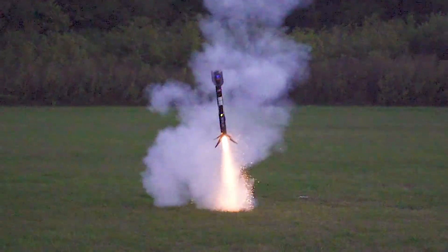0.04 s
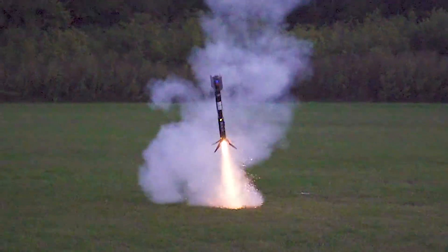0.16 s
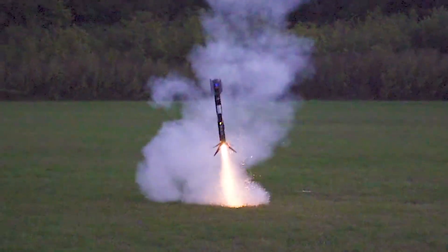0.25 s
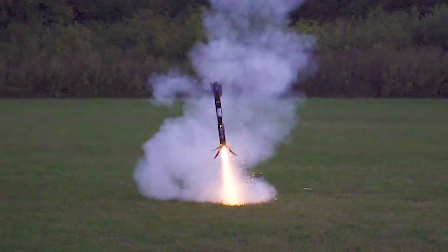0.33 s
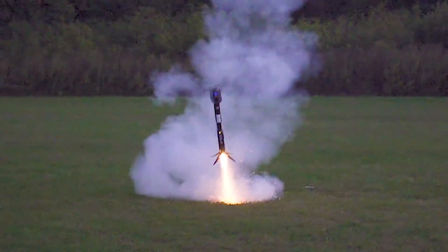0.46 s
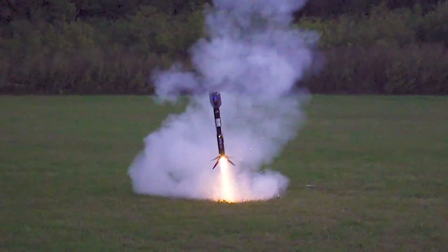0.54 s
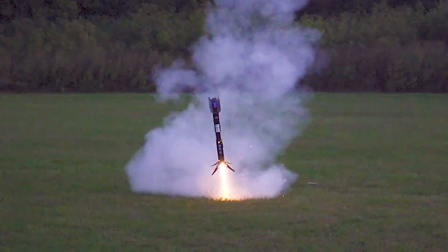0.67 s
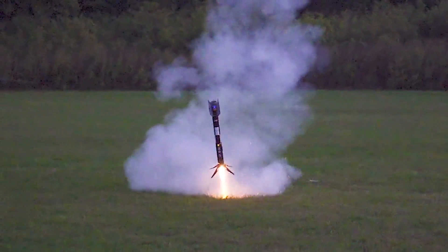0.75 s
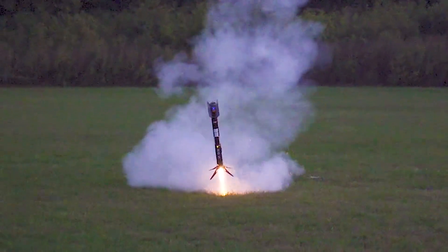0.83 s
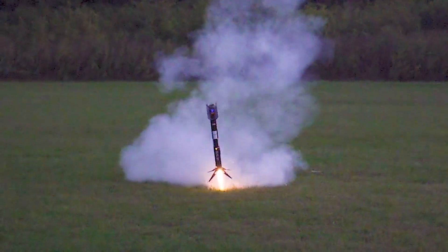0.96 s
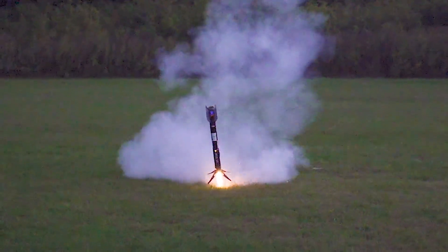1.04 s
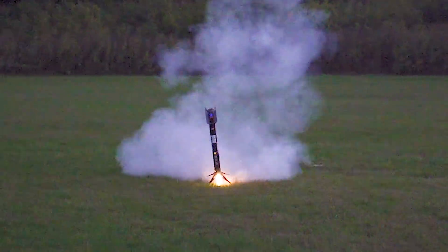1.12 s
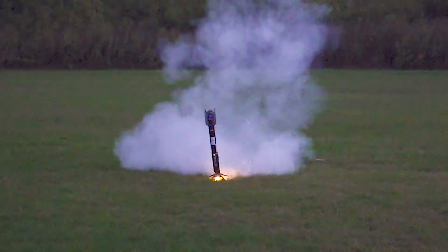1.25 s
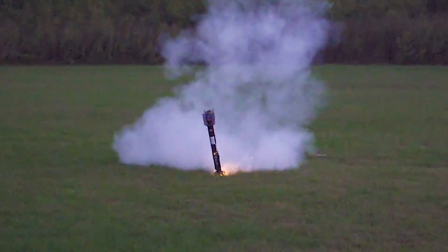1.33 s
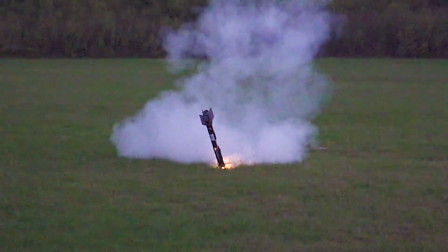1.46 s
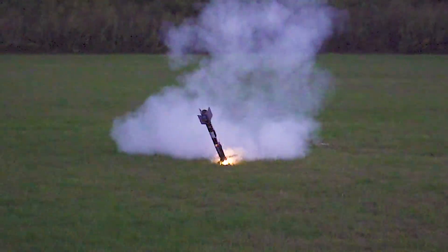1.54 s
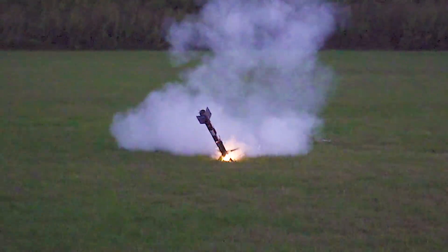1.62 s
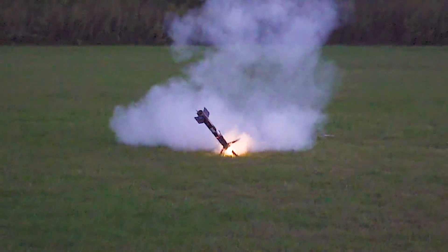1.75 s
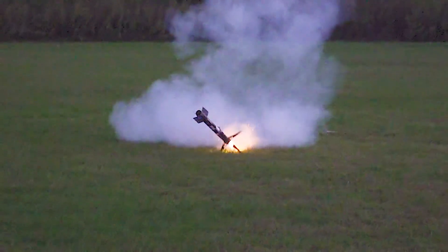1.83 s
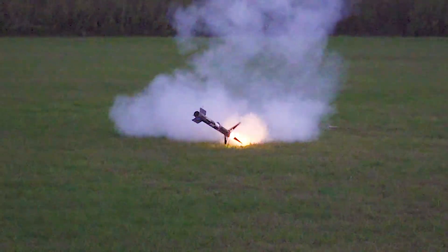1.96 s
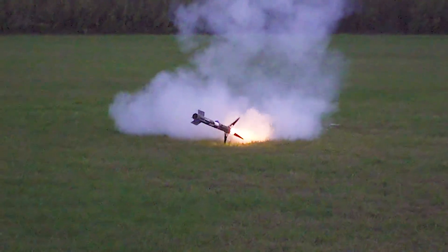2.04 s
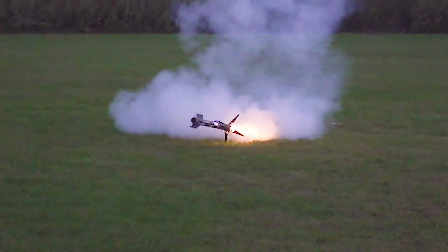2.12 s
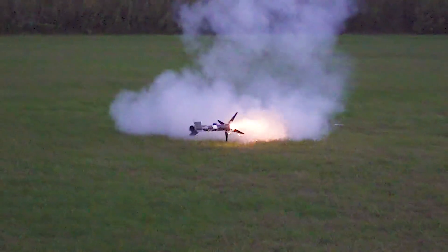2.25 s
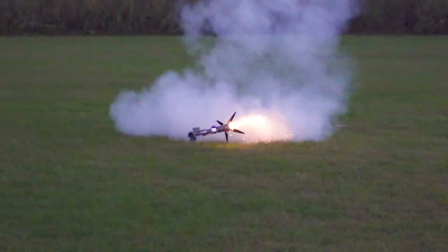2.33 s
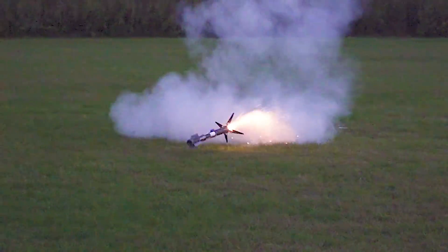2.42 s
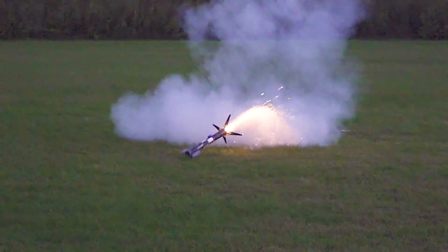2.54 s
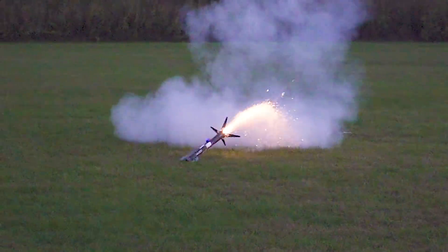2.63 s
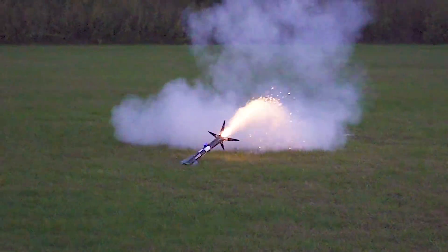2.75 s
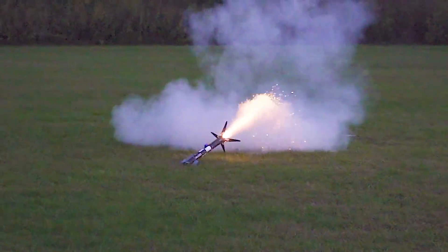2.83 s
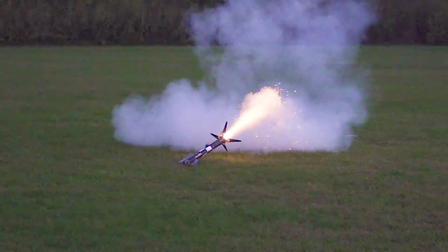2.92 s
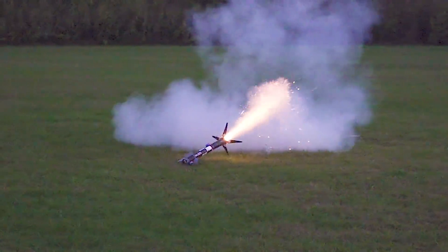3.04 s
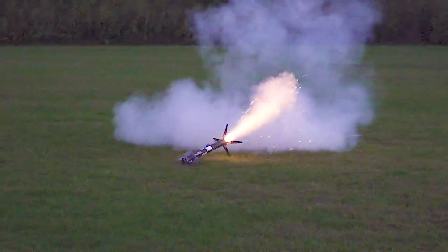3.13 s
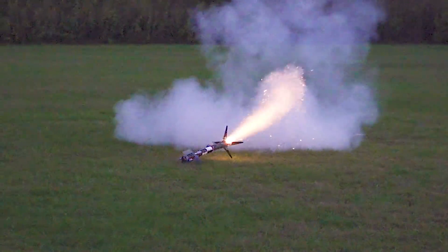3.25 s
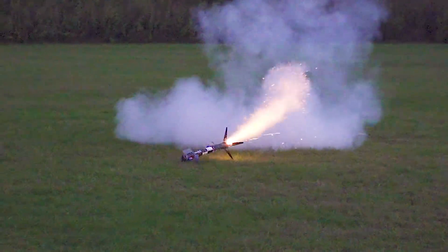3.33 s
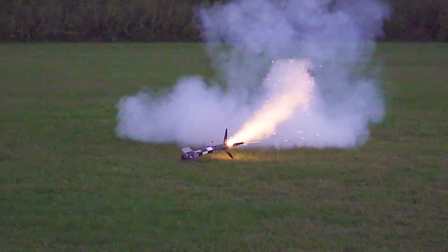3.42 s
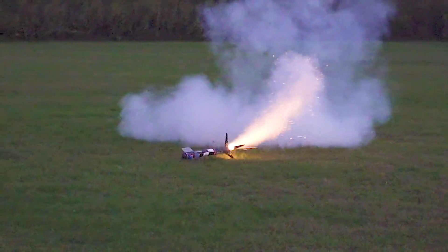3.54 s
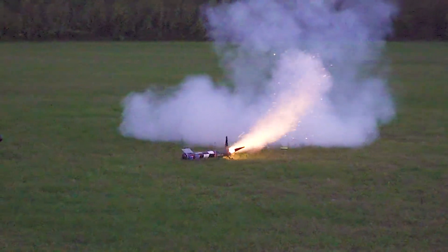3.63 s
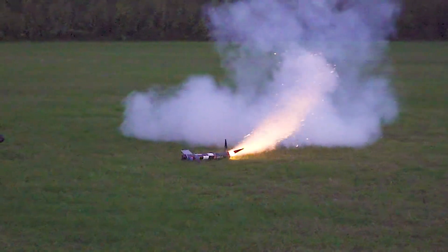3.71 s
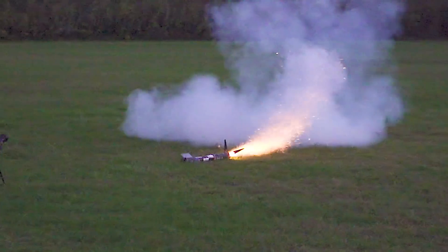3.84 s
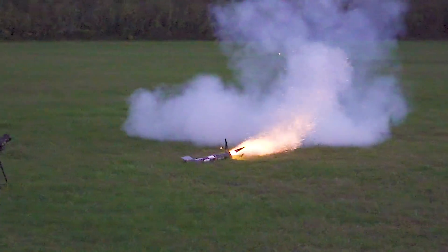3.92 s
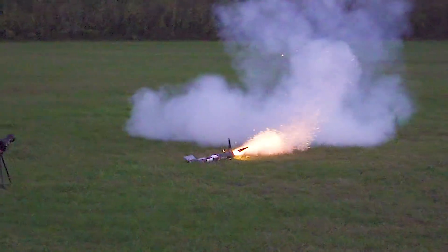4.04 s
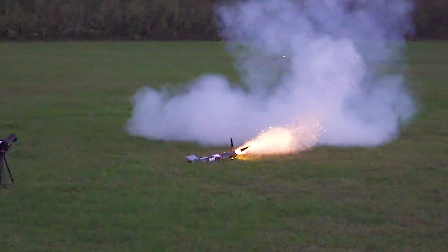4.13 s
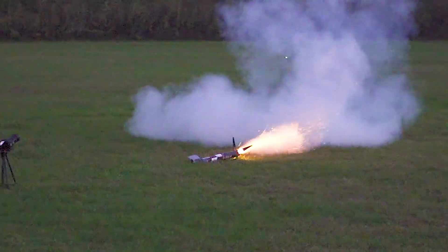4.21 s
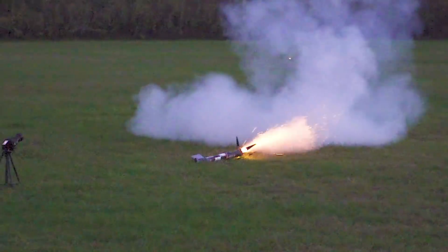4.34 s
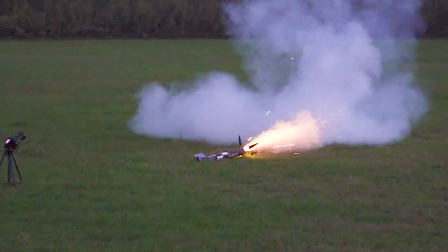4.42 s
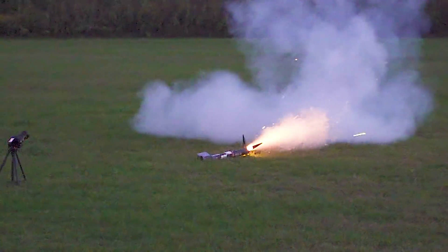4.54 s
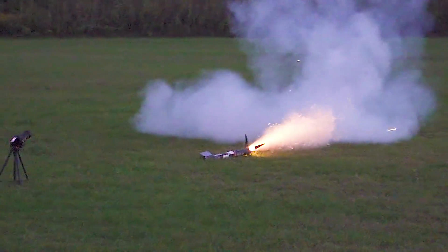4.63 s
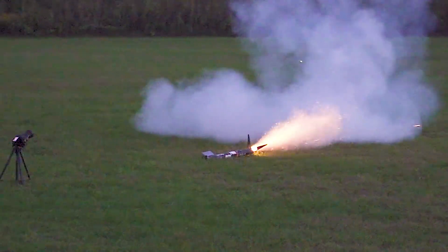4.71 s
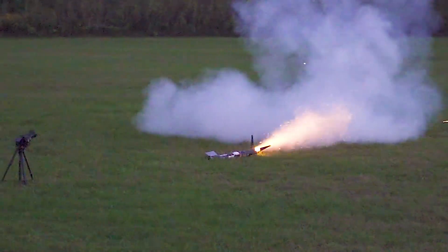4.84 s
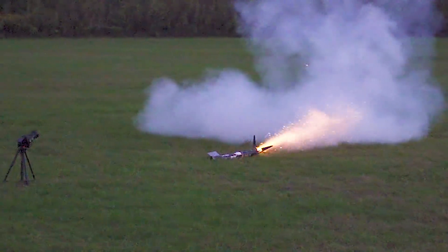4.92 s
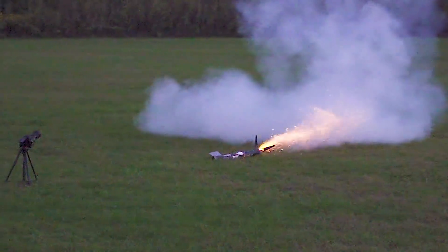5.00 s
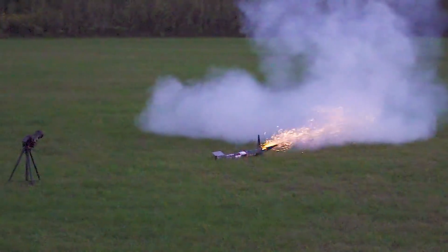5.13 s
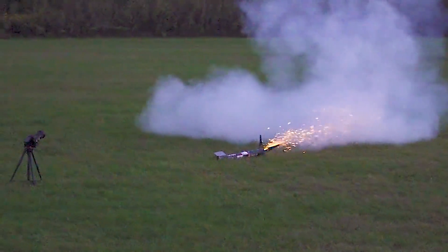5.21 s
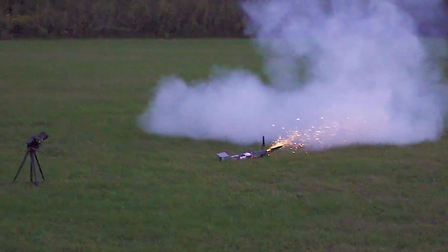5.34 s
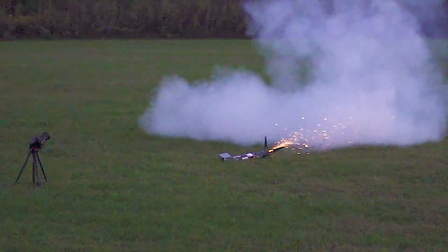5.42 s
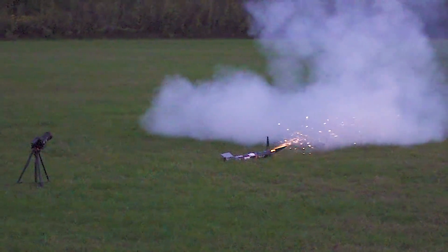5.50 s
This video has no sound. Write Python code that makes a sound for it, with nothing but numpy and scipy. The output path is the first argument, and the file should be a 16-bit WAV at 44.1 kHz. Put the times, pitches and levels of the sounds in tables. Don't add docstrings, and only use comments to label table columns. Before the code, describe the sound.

Loud slowed-down rocket exhaust rumbles and crackles dully over a field, shifting in tone as it topples, then burns out abruptly, bass fading last.

```python
import sys
import numpy as np
from scipy import signal
from scipy.fft import rfft, irfft, next_fast_len
from scipy.io import wavfile
from scipy.ndimage import uniform_filter1d

SR = 44100
rng = np.random.default_rng(int(sys.argv[2]) if len(sys.argv) > 2 else 0)


def rack_gain(trim_db):
    fader = np.asarray(trim_db, float)
    return 10 ** (fader / 20)


def wav_out(sig):
    wavfile.write(sys.argv[1], SR, np.round(np.clip(np.atleast_2d(sig).T, -1, 1) * 32767).astype(np.int16))


N = 245637
TIME = np.arange(N) / SR
SIZE = next_fast_len(N + SR // 2)
FREQ = np.maximum(np.fft.rfftfreq(SIZE, 1 / SR), 1)

# frequency in Hz, level in dB per Hz.
PLUME_COLOUR = [(12, -35), (20, 0.5), (117, 6), (215, 5.5), (327, -7), (440, -17.5), (488, -12.5),
                (628, -17.5), (775, -10), (1020, -12), (1260, -12), (1460, -15.5), (1580, -20), (2220, -17),
                (3040, -25.5), (3950, -66), (6690, -120)]
LAYER_EDGES_HZ = [12, 140, 255, 345, 430, 545, 680, 1050, 1580, 2150, 3400]
# level in dB, then its change in dB per dB of facing, of jet sharpness and of lean.
LAYERS = [(-17.5, -0.15, -.1, 0.45), (-16.5, -0.19, -0.39, -0.17), (-20.5, 0.43, -0.4, -0.75),
          (-29, 1.44, -0.46, -1), (-30.5, 0.99, -0.73, 0.72), (-27, 1.1, -.4, 0.58),
          (-20.5, 1.23, .25, -0.79), (-22, 1.07, 0.87, -0.46), (-31, 1.16, 1.1, -0.79),
          (-33, 0.55, 0.08, -1.1), (-55.5, 1.41, -0.12, 1)]
# time in seconds, facing the listener in dB, jet sharpness in dB, lean in dB.
NOZZLE = [(0.0, 5, -7, -0.1), (0.55, 5, -7, -0.8), (0.9, 4, -5, -0.5), (1.02, 1, -0.5, -2.1),
          (1.2, -3, -2.5, -1.5), (1.33, -4.5, -0.5, -1.9), (1.5, -10.5, 1.5, -0.1), (1.64, -7.5, 2.5, -5.5),
          (1.83, 0.8, 1.5, -2.5), (2.1, 0, 1, -1.1), (2.5, 5, 1.5, 3.1), (3.0, 5.5, 2, 3.8), (3.5, 4, 1, 4),
          (3.75, -1, -0.6, 1.3), (4.02, -7, -1, .6), (4.5, -1.5, -2.3, -0.5), (4.9, -4, 0.4, 0.5),
          (5.1, -7, -.8, 0)]
# centre in seconds, length in seconds, deep rumble swell in dB, boom swell in dB.
THUMPS = [(0.0, 0.017, 12.5, -6), (0.211, 0.12, -3, 2.5), (0.499, 0.016, -0.5, -3.5),
          (0.563, 0.045, -1.5, 4), (0.754, 0.073, -1.5, 1.6), (0.943, .04, -0.5, 1.1), (1.093, 0.24, 2, 0),
          (1.398, 0.034, 5.5, 1.5), (1.598, .1, -7, -3.5), (1.899, 0.089, -0.2, 5),
          (2.027, 0.049, 3.5, -0.5), (2.185, 0.027, 10, -0.4), (2.586, 0.039, -1, -3),
          (3.004, 0.088, -6.5, -0.8), (2.46, .03, -1.5, -2.4), (3.518, 0.18, -1, 0), (4.074, .05, 5, 1),
          (4.307, 0.038, 4.5, -2.3), (4.626, 0.056, -0.5, -1.5), (4.763, 0.033, -4.5, 0.3),
          (4.845, 0.073, 7, 0.8), (5.21, 0.024, -2, -2.5)]
# centre in seconds, length in seconds, swell in dB, pitch in Hz.
FLARES = [(0.0, 0.022, 5, 494), (0.495, 0.035, 2.5, 472), (0.921, 0.069, 3, 1187), (0.849, .1, -6.5, 3680),
          (1.041, 0.099, 2, 272), (1.056, .05, 5, 2220), (1.197, 0.035, -6, 1080), (1.27, .04, -8.5, 1300),
          (1.322, .03, 4.5, 896), (1.532, 0.14, 6, 367), (1.557, .08, 4, 1730), (1.657, 0.054, 6.5, 1730),
          (1.838, 0.11, -5.5, 412), (1.699, .08, -5.5, 4200), (1.946, .03, 3, 1290),
          (1.996, 0.11, -4.5, 4210), (2.051, 0.037, -7, 1270), (2.1, 0.054, 7.5, 650),
          (2.199, 0.26, 8, 2600), (2.335, .03, 3.5, 498), (2.674, .1, 4.5, 392), (2.946, 0.08, 3.5, 997),
          (3.201, 0.05, 1, 150), (3.3, 0.43, -5, 3590), (3.579, 0.013, 2.5, 900), (4.076, 0.022, 4, 900),
          (4.193, 0.091, -2, 390), (4.563, 0.055, 1.5, 800), (4.809, .05, 2.5, 786),
          (5.034, 0.025, 7.5, 1000), (5.119, .06, 6, 3550)]
# time in seconds, lag in milliseconds, strength from 0 to 1.
GRASS_ECHO = [
    (0, 1.95, 0.3),
    (1.1, 1.95, .25),
    (1.6, 2.4, 0.3),
    (2.3, 1.92, 0.1),
    (3.0, 1.92, .45),
    (3.6, 1.95, .5),
    (4.0, 1.97, .55),
    (4.4, 2.2, 0.2),
    (4.7, 1.95, 0.2),
    (5.57, 2.1, 0.2),
]
# time in seconds, splatter in dB, eddy
# pitch in Hz.
SURGES = [(0.0298, -35.5, 294), (0.064, -38.5, 122.7), (0.0598, -34, 207), (0.0817, -59, 121),
          (0.082, -38.5, 167), (0.098, -36.5, 195), (0.1213, -34, 290), (0.155, -56, 129.2),
          (0.16, -54.5, 241), (0.1785, -66, 117.2), (0.1762, -28, 166.3), (0.2114, -43.5, 143),
          (0.2262, -56.5, 118), (0.2256, -36, 210), (0.2516, -40.5, 175), (0.2966, -35.5, 206),
          (0.3116, -38, 284), (0.3531, -57, 310), (0.3661, -40, 140.3), (0.414, -43.5, 226),
          (0.458, -42, 224), (0.4839, -38, 211), (0.5256, -37.5, 285), (0.5451, -50, 312),
          (0.5447, -35, 233), (0.5714, -34, 248.4), (0.5752, -46.5, 245.6), (0.6697, -48, 187),
          (0.8042, -41.5, 147), (0.9892, -29, 216),
          (1.4199, -51, 123.6), (1.4244, -36, 127.7), (1.7724, -38.5, 262), (1.8409, -36.5, 125.3),
                 (1.8567, -34, 172), (1.8868, -53, 220.4), (1.899, -35, 204.6), (2.0348, -33.5, 149.6),
                 (2.099, -39.5, 148), (2.1341, -48, 154.2), (2.148, -39, 124.7), (2.364, -36.5, 123),
                 (2.4049, -38.5, 121), (2.4128, -42.5, 118.4), (2.5207, -37, 237), (2.5624, -51.5, 118.5),
                 (2.5641, -21, 135), (2.608, -41, 132.6), (2.6516, -38, 128), (2.9004, -41, 283.5),
                 (2.9188, -29, 123.5), (2.9422, -42, 267), (3.002, -39.5, 185), (3.9958, -45, 158),
                 (4.6016, -36.5, 139), (4.8517, -36, 171.8), (4.8542, -27, 127.6), (4.9048, -47.5, 128),
                 (4.9028, -45, 119)]
# frequency in Hz, level in dB.
FIZZ_COLOUR = [(3060, -26.5), (3190, -20.5), (3330, 3), (3480, 2), (3660, 1), (3800, -5), (4300, -9.5),
               (4420, -15), (4520, -31), (4700, -67.5)]
# time in seconds, peak in dB.
SPITS = [(0.095, -40), (1.1034, -49), (2.6994, -49), (2.796, -47), (2.815, -36), (2.8409, -42),
         (2.8594, -49), (2.9701, -39), (3.0589, -39), (3.0754, -37), (3.1168, -48), (3.1477, -42.5),
         (3.2016, -41), (3.2335, -42), (3.2999, -48), (3.331, -42), (3.5014, -45), (3.5857, -46)]
# frequency in Hz, level in dB per Hz.
FIELD_COLOUR = [(12, -22), (20, 0), (48, 8), (215, -10.5), (404, -15.5), (554, -10), (669, -16),
                (937, -10.5), (1020, -12.5), (3040, -43), (3950, -77.5), (6690, -120)]


def plume(soft_octaves=0.13, gust_db=1.0, flicker_db=-0.26):
    lag_ms, strength = curves(GRASS_ECHO)
    strength = np.clip(strength, 0, 0.95)
    echo_time = TIME - lag_ms / 1000
    gust, body, out = walk(22), colour(PLUME_COLOUR), 0
    for low, high, level in zip(LAYER_EDGES_HZ, LAYER_EDGES_HZ[1:], layer_levels()):
        band = body * np.sqrt(below(high, soft_octaves) - below(low, soft_octaves))
        direct = shape(rng.standard_normal(N), band)
        reflectivity = strength / (1 + (low / 820.0) ** 2)
        echo = reflectivity * np.interp(echo_time, TIME, direct)
        swell = rack_gain(level + gust_db * gust + flicker_db * walk(17))
        out = out + unit(direct - echo) * swell
    return out


def layer_levels():
    base, *shares = np.transpose(LAYERS)
    t = TIME[::64]
    pose = np.array(curves(NOZZLE))[:, ::64]
    db = base[:, None] + np.transpose(shares) @ pose
    edge = np.array(LAYER_EDGES_HZ)[:, None]
    octave = np.log2(edge * 1.185)

    shade_s, length_s, s_per_octave = 1.6, 0.14, 0.16
    shade_db, shade_hz, shade_octaves = -12.5, 620.0, 0.68
    under = np.log2(shade_hz) - octave
    passing = bump(t - shade_s - s_per_octave * under, length_s)
    db += shade_db * bump(under, shade_octaves) * passing

    for s, length, deep, boom in THUMPS:
        db[:3] += np.outer([deep, boom, 1.2 * boom], bump(t - s, length))
    flare_octaves = 0.48
    for s, length, swell, hz in FLARES:
        db += swell * bump(octave - np.log2(hz), flare_octaves) * bump(t - s, length)

    burnout_s, fade_s, bass_late_s, bass_hz = 5.155, 0.05, 0.12, 298
    sag_from_s, sag_db_per_s, ember_db = 4.942, 28.5, 17
    late = bass_late_s / (1 + (edge / bass_hz) ** 2)
    db -= sag_db_per_s * np.maximum(t - sag_from_s, 0)
    db -= ember_db * (1 + np.tanh((t - burnout_s - late) / fade_s)) / 2
    return [np.interp(TIME, t, layer) for layer in db]


def surges(x):
    out, span = x.copy(), np.arange(-900, 901)
    for s, db, hz in SURGES:
        near = int(s * SR) + np.arange(-10, 110)
        top = near[np.argmax(np.abs(out[near]))]
        crest_bend = abs(2 * out[top] - out[top - 3] - out[top + 3]) / 9
        bend = crest_bend + (2 * np.pi * hz / SR) ** 2 / 2
        height = np.clip(rack_gain(db + 9.0) ** 2 / (2 * bend), 0.012, 0.45)
        cycles = span * hz / SR
        eddy = np.cos(2 * np.pi * cycles) * np.exp(-(cycles / 0.55) ** 2 / 2)
        out[top + span] += (np.sign(out[top]) * (1 + height) - out[top]) * eddy
    return out


def fizz(overload):
    gain, upper = colour(FIZZ_COLOUR), 1 - below(3750.0, 0.04)
    db = layer_levels()[-1]
    smooth = shape(rng.standard_normal(N) * rack_gain(2.0 * walk(70)), gain * (1 - upper))
    drive_db = 0.14 * (db + 47.0)
    grain_db = np.clip(58.0 * (walk(200) - 0.35), 0, 11)
    sharpness = curves(NOZZLE)[1]
    lean = curves(NOZZLE)[2]
    grain = rack_gain(drive_db + grain_db) * rack_gain(-1.3 * lean)
    sputter = shape(rng.standard_normal(N) * grain, gain * upper * rack_gain(-1.0))
    bed = rack_gain(db + 4.0) * unit(smooth + sputter)
    idle_hiss = rack_gain(-83.0) * unit(shape(rng.standard_normal(N), np.sqrt(gain)))
    products = shape(rack_gain(-6.5) * overload, gain)
    spit_band = below(4450.0, 0.02) * (1 - below(3350.0, 0.06))
    return idle_hiss + bed + products + shape(rack_gain(14.5) * spits(), spit_band)


def spits(length_ms=2.4):
    gate, span = np.zeros(N), np.arange(-400, 401)
    puff = bump(span * 1000 / SR, length_ms)
    for s, db in SPITS:
        gate[int(s * SR) + 90 + span] += rack_gain(db) * puff
    return gate * rng.standard_normal(N)


def field():
    air = unit(shape(rng.standard_normal(N), colour(FIELD_COLOUR)))
    return air * rack_gain(-38.5 + 1.5 * walk(1.3))


def curves(table):
    s, *columns = np.transpose(table)
    return [np.interp(TIME, s, column) for column in columns]


def unit(x):
    return x / np.sqrt(np.mean(x ** 2))


def shape(x, gain):
    return irfft(rfft(x, SIZE) * gain, SIZE)[:N]


def colour(table):
    hz, db = np.transpose(table)
    return rack_gain(np.interp(np.log(FREQ), np.log(hz), db, left=-120, right=-120))


def below(hz, soft_octaves):
    return 0.5 - 0.5 * np.tanh(np.log2(FREQ / hz) / soft_octaves)


def walk(rate):
    hold = int(SR / rate)
    steps = np.repeat(rng.standard_normal(N // 100), hold)[:N]
    return 0.41 * uniform_filter1d(uniform_filter1d(steps, hold), hold)


def bump(x, width):
    return np.exp(-(x / width) ** 2)


def scene():
    return (plume() + field())[None]


def top_cut(x):
    return signal.sosfilt(signal.butter(12, 16000, fs=SR, output="sos"), x)


def record(dry):
    knee, power, top_hz = 0.95, 4.0, 3052
    rounded = dry[0] / (1 + np.abs(dry[0] / knee) ** power) ** (1 / power)
    kept = shape(rounded, np.sqrt(below(top_hz, 0.002)))
    overload = rounded - dry[0]
    mix = np.clip(surges(kept + fizz(overload)), -1, 1)[None]
    return top_cut(mix)


dry = scene()
out = record(dry)
wav_out(out)
```